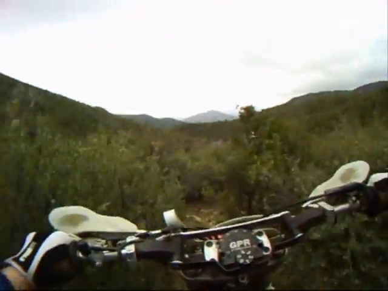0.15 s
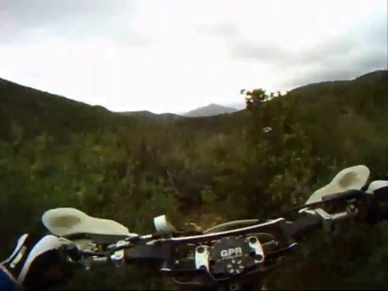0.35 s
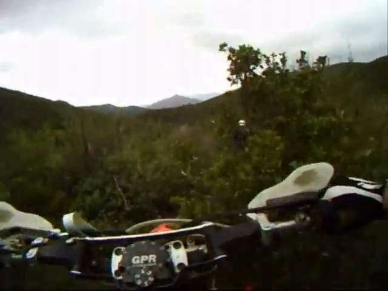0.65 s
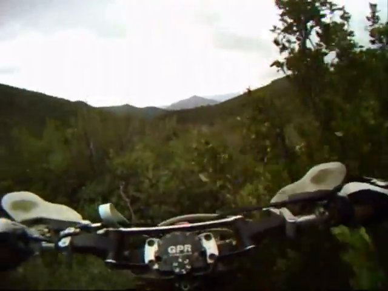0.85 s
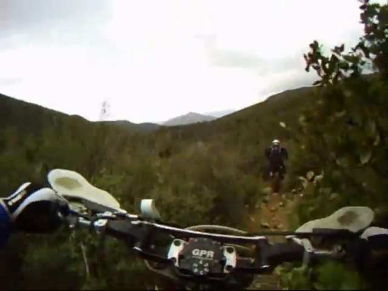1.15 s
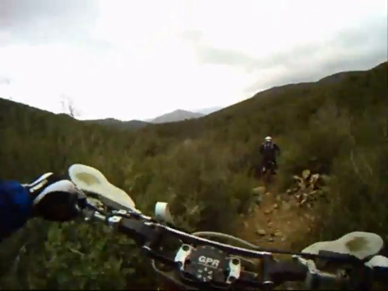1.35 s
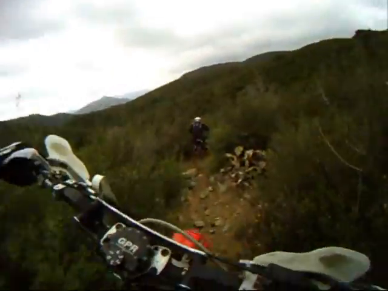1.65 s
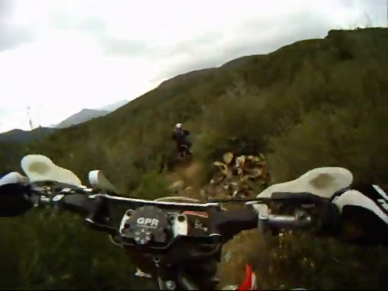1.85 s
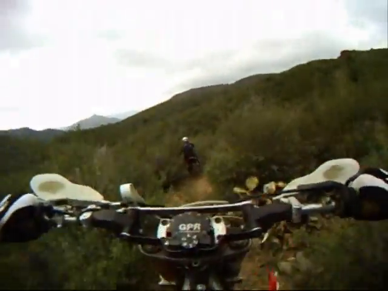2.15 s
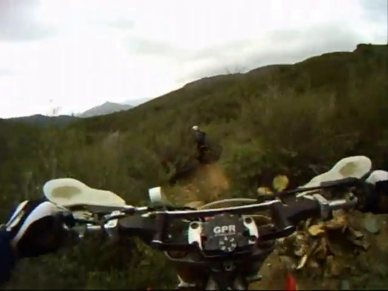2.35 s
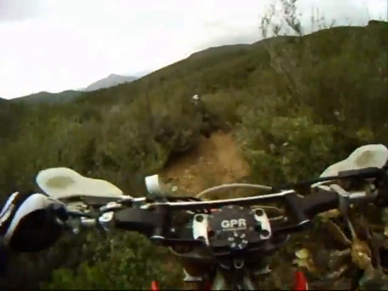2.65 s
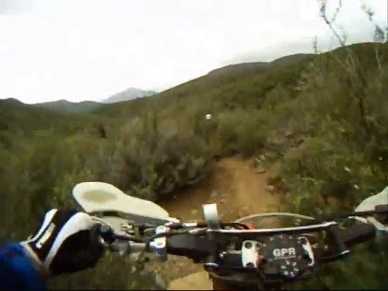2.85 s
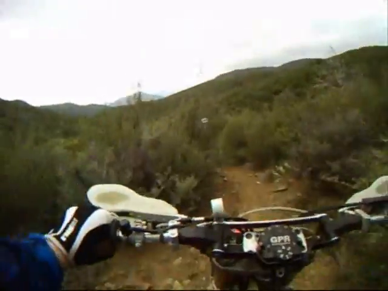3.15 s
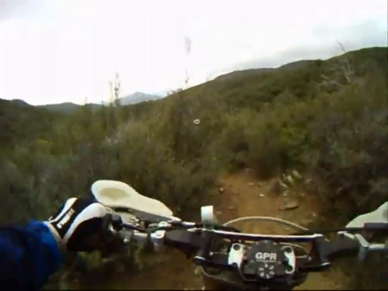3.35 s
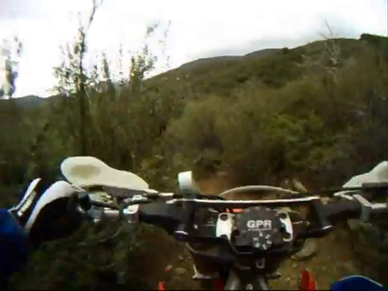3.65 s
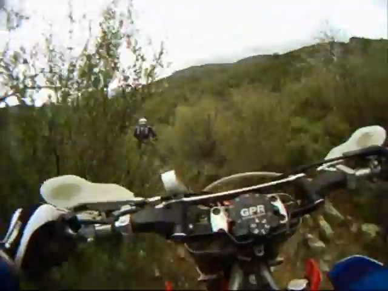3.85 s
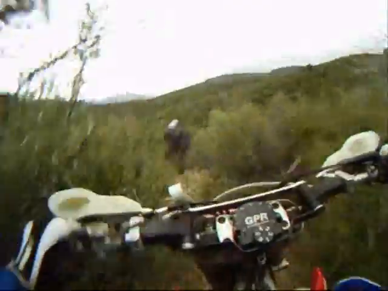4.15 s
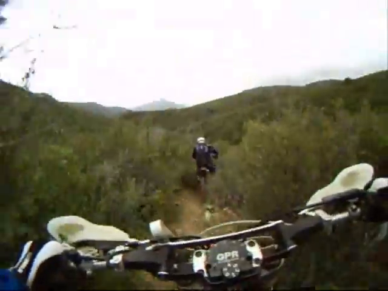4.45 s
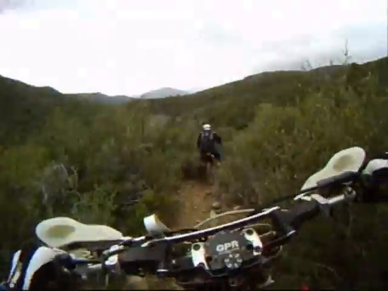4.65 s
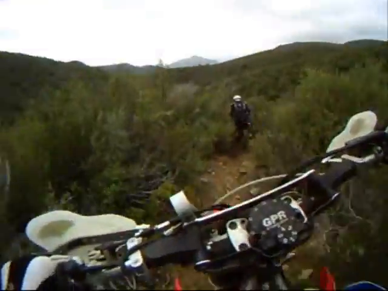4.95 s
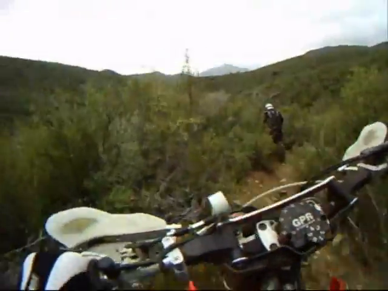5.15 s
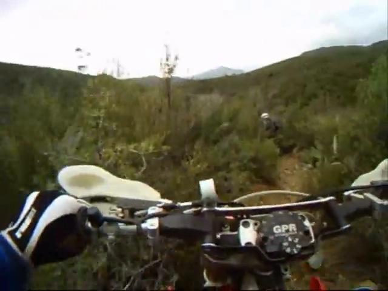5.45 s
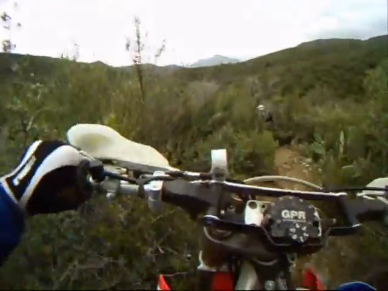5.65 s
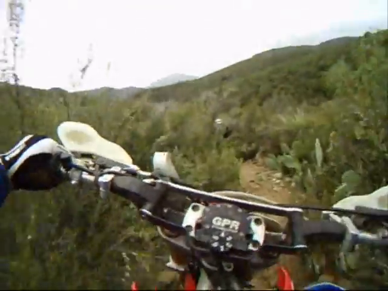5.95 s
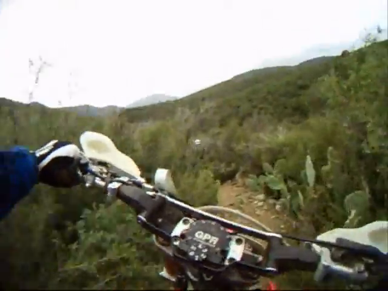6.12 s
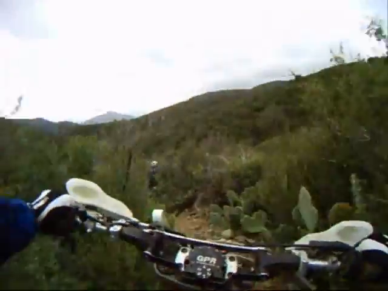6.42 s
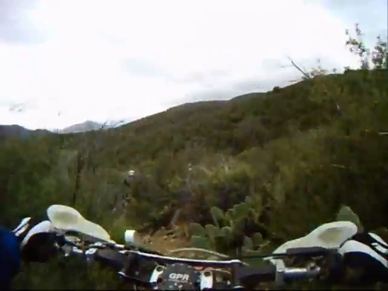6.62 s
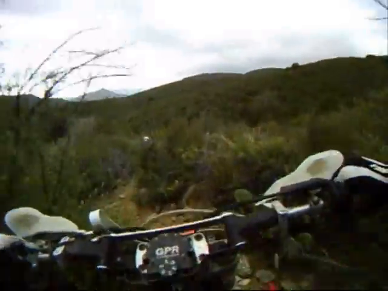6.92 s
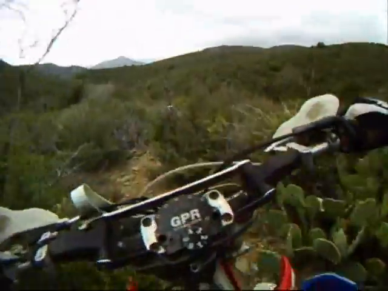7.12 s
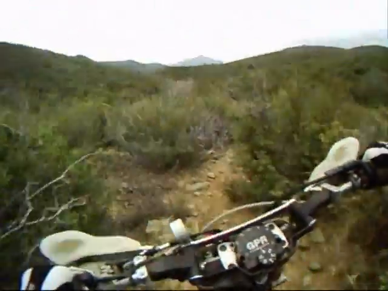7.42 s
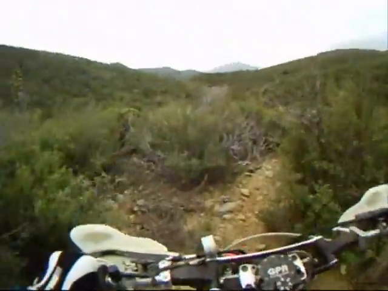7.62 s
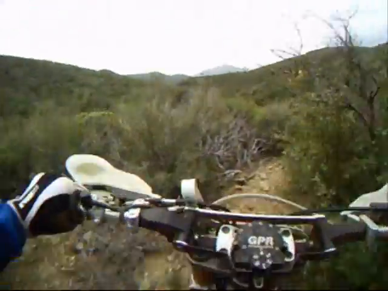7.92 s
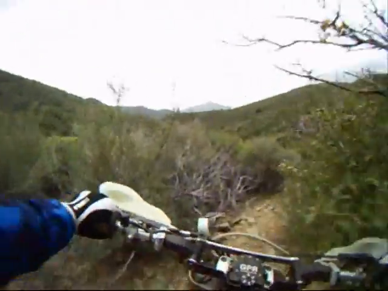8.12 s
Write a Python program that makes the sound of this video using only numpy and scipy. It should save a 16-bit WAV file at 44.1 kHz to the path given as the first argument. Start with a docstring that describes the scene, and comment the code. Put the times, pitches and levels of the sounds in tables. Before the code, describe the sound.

A single-cylinder four-stroke dirt bike creeps along a stony, brushy trail, heard close from a helmet microphone inside a hollow plastic case. The engine putters at about fourteen soft puffs a second, with thin, pulsing mechanical clatter. Knocks and short booms begin at once; from 1.0 to 1.4 s a branch and twigs crackle and slap at the case. The throttle blips, peaking near 1.7 s, and falls back to idle by about 2.5 s. Scattered rock clacks and rattles follow at 2.3, 2.8 and 3.1 s. Around 3.9 to 4.15 s a branch scrapes violently, with the loudest crack, low buffeting and choked, crackling overload. It is then calmer, mostly idle and tiny stone ticks, until hard thumps at 5.6 and 5.9 s, a sharp knock at 6.7 s, lighter ones near 7.2 s, and a heavy hit at 7.8 s. Rumbling and knocks close the ride as revs rise slightly.

```python
"""A rocky, overgrown trail: a single-cylinder four-stroke dirt bike creeps down it, heard from a helmet camera in a plastic case.
The engine ticks over: puffs ring the exhaust pipe and noise from the valve gear shakes the case, with one short blip of throttle.
Twigs, stones and loose parts knock as bursts of noise through the case; bumps boom the camera mount as fading tones.
Jolts drive the microphone against its limit, so the sound chokes for instants and the hardest knocks crackle."""
import sys
import numpy as np
from scipy import signal
from scipy.fft import rfft, irfft
from scipy.io import wavfile
from scipy.ndimage import uniform_filter1d

SR = 44100
rng = np.random.default_rng(int(sys.argv[2]) if len(sys.argv) > 2 else 0)


def int16_out(signal):
    """Quantize to a 16-bit WAV file."""
    q = np.round(np.clip(np.atleast_2d(signal).T, -1, 1) * 32767)
    wavfile.write(sys.argv[1], SR, q.astype(np.int16))


N = 365148
TIME = np.arange(N) / SR

# All levels in the tables are relative; the functions set the loudness of each layer.
# the helmet shaking in the air: time_s, buffeting_db
HELMET_SHAKE = [(0.0, -19), (0.16, -24), (1.31, -18), (1.73, -26.5), (2.42, -21), (3.74, -20), (3.83, -36),
                (4.1, -6.5), (4.22, -29), (6.43, -26), (6.48, -16), (7.03, -30.5), (7.17, -19), (7.54, -31),
                (7.98, -12.5), (8.28, -29)]
# colour of that buffeting: pitch_hz, level_db (per Hz)
BUFFET_SPECTRUM = [(12, -4), (22, -3.5), (34, -1), (50, -14.5), (80, -19), (130, -26), (300, -74)]
# roughness of the trail: time_s, rumble_db
TRAIL_ROUGHNESS = [(0.0, -28.5), (1.11, -30.5), (1.27, -18.5), (1.64, -38), (1.89, -31), (2.28, -28.5),
                   (2.63, -32.5), (3.04, -30.5), (3.62, -31), (4.06, -15.5), (4.24, -32.5), (5.51, -37.5),
                   (6.66, -35.5), (6.9, -38), (7.26, -36), (7.7, -36), (7.93, -21), (8.28, -23.5)]
# colour of the frame's rumble: pitch_hz, level_db (per Hz)
FRAME_SPECTRUM = [(40, -20), (75, -2), (140, 0), (200, -10), (300, -19), (500, -25), (900, -32),
                  (2000, -55)]
# branches dragging over the helmet: start_s, end_s, pressure_db, slap_db
DRAGGING_BRANCHES = [(1.084, 1.133, 0.5, -22), (3.996, 4.096, 1, -3.5)]
# colour of a branch's flapping: pitch_hz, level_db (per Hz)
FLAPPING_SPECTRUM = [(25, -2), (60, 0), (120, -7), (250, -20), (700, -38)]
# jolts that pump the air in the case: middle_s, half_width_s, pressure (1 = full scale, before the swing is shaped)
AIR_JOLTS = [(.797, 0.025, 2.35), (1.073, 0.017, 2.2), (1.272, 0.016, 0.82), (2.455, 0.11, 1.42),
             (3.009, 0.018, 2.53), (3.98, 0.013, 5.7), (6.697, 0.024, 2.76), (7.186, 0.013, 1.8),
             (7.752, 0.026, 1.78), (8.027, 0.046, 2.6)]
# rocks under the wheels boom the mount and clack the chassis: start_s, boom_db, boom_t60_s (time to fade 60 dB), clack_db
ROCK_HITS = [(0.277, -11.5, 0.15, -14.5), (.477, -0.5, 0.018, -6), (0.694, -3.5, 0.058, -7),
             (0.898, -7, 0.04, -25.5), (1.195, -13, 0.21, -17.5), (1.424, -13.5, 0.082, -30),
             (2.097, -13, 0.084, -54), (2.274, -14, 0.33, -7.5), (2.841, -7.5, 0.046, -22.5),
             (3.141, -13, 0.098, -11.5), (3.372, -20, 0.15, -19), (3.886, -11, 0.12, -10),
             (4.407, -19.5, 0.072, -21.5), (5.618, -7.5, 0.13, -8), (5.898, 2, 0.058, -5),
             (7.204, -18.5, 0.13, -19), (7.823, 0, 0.077, -5.5)]
# tones of the camera mount: pitch_hz, level_db, ring_share (of the boom's t60)
MOUNT_TONES = [(115.1, 0, 1.49), (142.5, -6.5, 0.67), (232.5, -7, 0.58), (388, 3, 0.037)]
# twigs striking the helmet and handlebar: start_s, crack_db, hollow_body_db, rise_s (time to the peak)
TWIG_KNOCKS = [(.094, -2, -12, 0.0025), (.328, -18, -13, 0.00075), (.374, -14, -14.5, 0.0026),
               (1.047, 2.5, -7.5, 0.0046), (1.079, 0, -2, 0.003), (1.107, -9, -9, 0.0032),
               (1.142, -6, -9, 0.0013), (1.224, -5.5, -10, 0.0069), (1.31, -0.5, -3, 0.00088),
               (1.349, -6.5, -17, 0.0024), (1.377, -16, -13, 0.0018), (2.205, -16, -18.5, .003),
               (3.192, -23, -18, 0.0018), (3.401, -24.5, -16.5, 0.002), (3.55, -2.5, -17.5, 0.0024),
               (3.755, -20, -24.5, 0.0061), (3.774, -7, -15.5, 0.0018), (3.792, -10.5, -23, 0.003),
               (3.944, -3, -9, 0.012), (3.959, -3.5, -2.5, 0.011), (4.115, 6.5, 2, 0.00037),
               (4.209, -19, -16, 0.0028), (5.722, -23, -22.5, 0.005), (6.581, -22.5, -19.5, 0.0022),
               (6.697, -4, 1, 0.00035), (7.137, -8.5, -14, 0.0053), (7.93, -24, -15, 0.0045),
               (7.986, -5, -4, .0012), (8.191, -9, -5.5, 0.0016)]
# resonances of the camera case: pitch_hz, width_hz, engine_level_db, knock_level_db
CASE_RESONANCES = [(318, 130, -70, -28), (613, 48, 16, -2.5), (710, 26, 10.5, -5), (1138, 56, 9, -20),
                   (1240, 53, 5, -31), (1526, 95, 4, 12), (1833, 223, -7.5, 11), (2148, 134, 9, 13.5),
                   (2343, 117, 2, 13.5), (3160, 480, -21, 1.5), (4540, 940, -11.5, -1.5),
                   (5560, 306, -0.5, 2.5), (6680, 210, -16.5, -62), (8800, 2400, -14, -14),
                   (9910, 520, -17, -1.5), (13690, 390, -8, 1), (14600, 390, -51, -45)]
# contacts within one engine cycle: position (share of the cycle after firing), width (share of the cycle), strength (no unit)
VALVE_CONTACTS = [(.12, 0.15, 0.19), (.38, 0.45, 0.18), (0.869, 0.096, 0.91)]
# tones of the exhaust pipe: pitch_hz, t60_s (time to fade 60 dB), level_db
PIPE_TONES = [(72, .07, -20), (145, .06, -14), (255, .03, -9), (300, .04, 0)]
# twists of the throttle, one sharp blip and two nudges: top_s, half_width_s, extra_firings_per_s
THROTTLE_TWISTS = [(1.735, .516, 15.5), (3.95, .38, 1.6), (8.28, 1.35, 1.85)]

IDLE_FIRINGS_PER_S, FIRING_PHASE_CYCLES = 13.85, .17
PUFF_DB, THROTTLE_DB_PER_OCTAVE = -14.7, 11.0
THROTTLE_LEADS_S = 0.07   # the exhaust barks before the revs have caught up
# engine clatter at idle on average ground, its rise with revs, and the share of the trail's swing that it follows
CLATTER_DB, CLATTER_DB_PER_OCTAVE, CLATTER_FOLLOWS = -38.5, 5, 0.29
CLACK_RISE_S, CLACK_HOLLOW_DB = 0.0011, 2   # time to a clack's peak; its body stands this far above its crack
RATTLE_OVER_TRAIL_DB, RATTLE_SPREAD_DB, RATTLE_RISE_S = 3.5, 3.5, 0.0044   # loose parts knocking at random
GRAZE_S, GRAZE_LOSS_DB, GRAZE_RISE_S = 0.0095, 19, 0.0029   # the tyre scrapes a rock just before it hits
SLAPS_PER_S, SLAP_RISE_S = 71, 0.0017   # a dragging branch stutters over the case
JOLT_HZ = 24.25
TOP_CUTOFF_HZ = 15900


def from_db(db):
    """Turn decibels into a plain multiplier."""
    return 10 ** (np.asarray(db) / 20)


def rms_one(x):
    """Scale to an average power of one."""
    return x / np.sqrt(np.mean(x ** 2) + 1e-20)


def in_time(rows):
    """Draw straight lines between the points of a curve, giving each column at every sample."""
    times, *columns = np.transpose(rows)
    return [np.interp(TIME, times, column) for column in columns]


def add(track, start_s, sound):
    """Mix a sound into a track at a given time."""
    first = max(0, int(start_s * SR))
    track[first:first + len(sound)] += sound[:max(0, N - first)]


def cut(x, hz, kind, order=2):
    """Remove part of the pitch range with a smooth (Butterworth) filter."""
    return signal.sosfilt(signal.butter(order, hz, kind, fs=SR, output="sos"), x)


def coloured(spectrum):
    """Shape white noise to a spectrum, silent outside its range, with an average power of one."""
    hz, db = np.transpose(spectrum)
    bins_hz = np.maximum(np.fft.rfftfreq(N, 1 / SR), 1)
    gain = from_db(np.interp(np.log(bins_hz), np.log(hz), db, -np.inf, -np.inf))
    return rms_one(irfft(rfft(rng.standard_normal(N)) * gain, N))


def evened(x, size):
    """Take the slow swells out of a noise by dividing by its power over a window of size samples."""
    return x / np.sqrt(uniform_filter1d(x ** 2, size) + 1e-6)


def through_case(x, modes, leak_db, colour_db=0):
    """Ring the case's resonances side by side, plus a direct leak; white noise keeps its power."""
    # an impulse goes through alongside the sound, to find the overall gain
    both = np.stack([x, signal.unit_impulse(len(x))])
    both[1] += 1e-18
    out = from_db(leak_db) * cut(both, [300, 2600], "band", order=1)
    for (hz, width, db), extra_db in zip(modes, np.zeros(len(modes)) + colour_db):
        r = np.exp(-np.pi * width / SR)
        feed = np.array([1, 0, -1]) * (1 - r * r) / 2
        feedback = [1, -2 * r * np.cos(2 * np.pi * hz / SR), r * r]
        out += from_db(db + extra_db) * signal.lfilter(feed, feedback, both)
    return out[0] / np.linalg.norm(out[1])


def air_buffeting(shake_db, gain_db=10.5):
    """The helmet shakes in the air: low noise that swells and fades with the shaking."""
    return from_db(shake_db + gain_db) * evened(coloured(BUFFET_SPECTRUM), size=7000)


def frame_rumble(trail_db, gain_db=3.0):
    """The frame rumbles: low noise that grows with the roughness of the trail."""
    return from_db(trail_db + gain_db) * evened(coloured(FRAME_SPECTRUM), size=5000)


def gravel(trail_db, per_s=50.0, gain_db=-7.0, spread_db=2.8, fade_s=.004):
    """Small stones and leaves tick at random, as short noise bursts, louder where the ride is rough."""
    tick_size = from_db(spread_db * np.minimum(rng.exponential(1, N), 3))
    ticks = (rng.random(N) < per_s / SR) * tick_size
    fading = signal.lfilter([1], [1, -np.exp(-1 / (fade_s * SR))], ticks + 1e-18)
    bursts = fading * rng.standard_normal(N)
    modes = np.array(CASE_RESONANCES)[:, [0, 1, 3]]
    dulled = cut(bursts, 2500, "low", order=1)      # they sound from down at the wheels
    return from_db(trail_db + gain_db) * through_case(dulled, modes, leak_db=-50.0)


def jolts():
    """Each jolt is a swing or two of air pressure, too low to hear by itself."""
    out = np.zeros(N)
    for middle_s, width, pressure in AIR_JOLTS:
        away_s = TIME - middle_s
        swell = np.exp(-np.minimum((away_s / width) ** 2, 20))
        out += pressure * np.sin(2 * np.pi * JOLT_HZ * away_s) * swell
    return out


def branches():
    """A branch slaps to and fro on the case: strong low noise that throws the pressure both ways."""
    grip = np.zeros(N)
    for start, end, db, _ in DRAGGING_BRANCHES:
        add(grip, start, from_db(db) * signal.windows.tukey(int(max(end - start, .01) * SR), .2))
    return grip * evened(coloured(FLAPPING_SPECTRUM), size=3000)


def mount(gain_db=10.5, stiffening=0.33, relax_s=0.0075, attack_s=0.0033, buzz_db=-37.0, buzz_hz=7950.0):
    """The camera mount booms: fading tones start sharp, as if stiffer, and sink in pitch beside a thin buzz."""
    out, t = np.zeros(N), np.arange(SR // 2) / SR
    bent_t = t + stiffening * relax_s * (1 - np.exp(-t / relax_s))
    attack = 1 - np.exp(-t / attack_s)
    for start_s, db, t60, _ in ROCK_HITS:
        fade_db = -60 * t / max(t60, .02)
        colour_db = rng.normal(0, 1.5, len(MOUNT_TONES))
        boom = np.zeros(len(t))
        for (hz, tone_db, share), extra_db in zip(MOUNT_TONES, colour_db):
            boom += from_db(tone_db + extra_db + fade_db / share) * np.sin(2 * np.pi * hz * bent_t)
        hiss = rms_one(cut(rng.standard_normal(len(t)), [buzz_hz - 300, buzz_hz + 300], "band"))
        buzz = hiss * from_db(buzz_db + fade_db / 2)
        add(out, start_s, from_db(db + gain_db) * attack * (boom + buzz))
    return out


def blows(trail_db, rattle_count=50):
    """List every blow on the case (start_s, crack_db, body_db, rise_s): twigs, rocks, loose parts, branches."""
    clacks = [(s, db, db + CLACK_HOLLOW_DB, CLACK_RISE_S) for s, _, _, db in ROCK_HITS]
    grazes = [(s - GRAZE_S, crack - GRAZE_LOSS_DB, body - GRAZE_LOSS_DB, GRAZE_RISE_S)
              for s, crack, body, _ in clacks]
    times = TIME[-1] * rng.random(rattle_count)
    spread_db = RATTLE_SPREAD_DB * rng.uniform(-0.8, 1, rattle_count)
    levels = np.interp(times, TIME, trail_db) + RATTLE_OVER_TRAIL_DB + spread_db
    rattles = [(s, db, db, RATTLE_RISE_S) for s, db in zip(times, levels)]
    slaps = [(s + rng.normal(0, .002), db, db, SLAP_RISE_S * rng.uniform(.5, 1.5))
             for start, end, _, db in DRAGGING_BRANCHES for s in np.arange(start, end, 1 / SLAPS_PER_S)]
    return list(TWIG_KNOCKS) + clacks + grazes + rattles + slaps


def knocks(rows, crack_gain_db=-7.0, tail_db=-16.0, tail_s=0.012, boost_db=3.0):
    """Each knock is a brief, gritty scrape into the case with a faint chatter after it."""
    out, t = np.zeros(N), np.arange(SR // 12) / SR
    modes = np.array(CASE_RESONANCES)[:, [0, 1, 3]]
    for start_s, crack_db, body_db, rise in rows:
        u = t / max(rise, 1 / SR)
        shape = u * np.exp(1 - u) + from_db(tail_db) * np.exp(-t / tail_s)
        # all but the very faintest knocks get the full boost
        force = from_db(boost_db * np.clip(6.0 + (crack_db - 9.5) / 10, 0, 1)) * shape
        grit = rms_one(rng.laplace(size=(2, len(t))))
        colour_db = rng.normal(0, 3, len(modes))      # the spot that is struck favours some modes
        # the five lowest resonances make the hollow body, the rest the crack
        crack = through_case(force * grit[0], modes[5:], leak_db=-4.5, colour_db=colour_db[5:])
        body = through_case(force * grit[1], modes[:5], leak_db=-8.5, colour_db=colour_db[:5])
        add(out, start_s, from_db(crack_db + crack_gain_db) * crack + from_db(body_db) * cut(body, 1020, "low"))
    return out


def engine_speed():
    """Firings per second: the idle, swelling and sinking with each twist of the throttle."""
    speed = IDLE_FIRINGS_PER_S
    for top_s, width, extra in THROTTLE_TWISTS:
        speed = speed + extra * np.exp(-((TIME - top_s) / width) ** 2)
    return speed


def valve_gear(cycles, revs, clatter_db, grain_db=2.5, drone_db=-39.0):
    """Chain and gears hiss and valves clack each cycle, as pulsing noise; with revs two case modes drone."""
    beat = .7
    for position, width, strength in VALVE_CONTACTS:
        from_contact = (cycles - position + .5) % 1 - .5
        beat = beat + strength * np.exp(-(from_contact / width) ** 2)
    grain = from_db(grain_db * rms_one(cut(rng.standard_normal(N), 118, "low")))
    drive = rms_one(beat * grain * rng.standard_normal(N))
    modes = np.array(CASE_RESONANCES)[:, :3]
    clatter = from_db(clatter_db) * through_case(drive, modes, leak_db=-84.0)
    low_modes = [(hz, width, 0) for hz, width, _ in modes[[1, 3]]]
    drone = from_db(drone_db) * np.maximum(revs, 0) * through_case(drive, low_modes, leak_db=-66.0)
    return clatter + drone


def exhaust(cycles, throttle):
    """One puff a firing rings the pipe, harder as the throttle opens; no two firings are quite alike."""
    out, t = np.zeros(N), np.arange(SR // 10) / SR
    opening = 1 - np.exp(-(t / .008) ** 2)
    fired = np.flatnonzero(np.diff(np.floor(cycles)) > 0)
    for i, chance in zip(fired, rng.standard_normal((len(fired), 2, len(PIPE_TONES)))):
        puff = np.zeros(len(t))
        for (hz, t60, db), level_luck, pitch_luck in zip(PIPE_TONES, *chance):
            tone = np.sin(2 * np.pi * hz * (1 + .035 * pitch_luck) * t)
            puff += from_db(db + 1.6 * level_luck) * tone * from_db(-60 * t / t60)
        add(out, i / SR, puff * opening * from_db(PUFF_DB + THROTTLE_DB_PER_OCTAVE * throttle[i]))
    return out


def scene():
    """Add the shaking of the ride, the knocks and the engine, as pressure at the microphone."""
    (shake_db,), (trail_db,) = in_time(HELMET_SHAKE), in_time(TRAIL_ROUGHNESS)
    ride = air_buffeting(shake_db) + frame_rumble(trail_db) + gravel(trail_db) + jolts() + branches() + mount()
    hits = knocks(blows(trail_db))

    speed = engine_speed()
    cycles = np.cumsum(speed) / SR - FIRING_PHASE_CYCLES
    revs = np.log2(speed / np.median(speed))      # octaves above the middle (median) speed
    trail_swing_db = trail_db - trail_db.mean()
    clatter_db = CLATTER_DB + CLATTER_DB_PER_OCTAVE * revs + CLATTER_FOLLOWS * trail_swing_db
    throttle = np.interp(TIME + THROTTLE_LEADS_S, TIME, revs)
    engine = valve_gear(cycles, revs, clatter_db) + exhaust(cycles, throttle)
    return (ride + hits + engine)[None]


def record(dry, limit=0.96, coupling_hz=79.3):
    """The microphone blocks at its limit, a capacitor drains the lows, the converter clips, the top is cut."""
    blocked = dry / (1 + (dry / limit) ** 16) ** (1 / 16)
    drained = cut(blocked, coupling_hz, "high", order=1)
    clipped = np.clip(drained, -1, 1)
    return signal.sosfilt(signal.ellip(10, .1, 80, TOP_CUTOFF_HZ, fs=SR, output="sos"), clipped)


dry = scene()
out = record(dry)
int16_out(out)
```